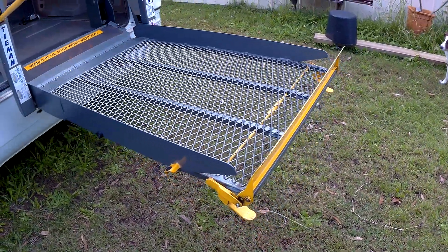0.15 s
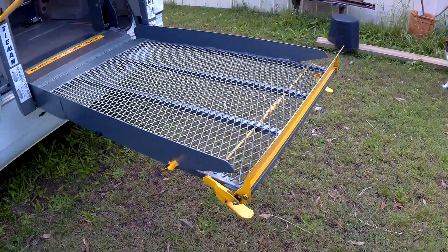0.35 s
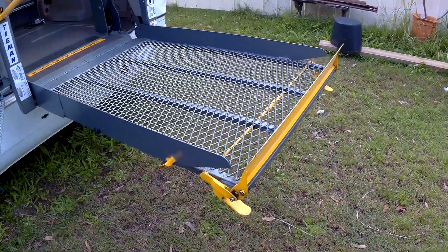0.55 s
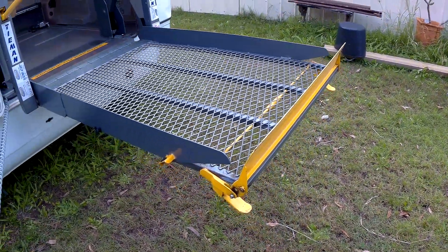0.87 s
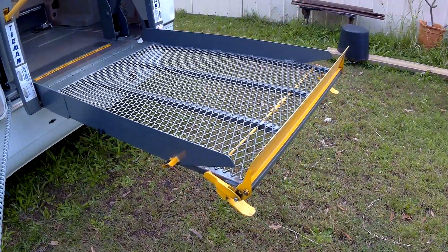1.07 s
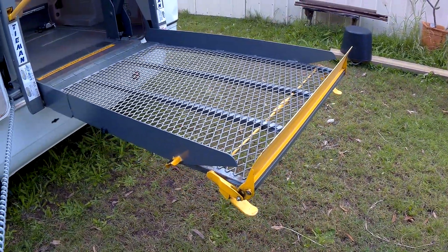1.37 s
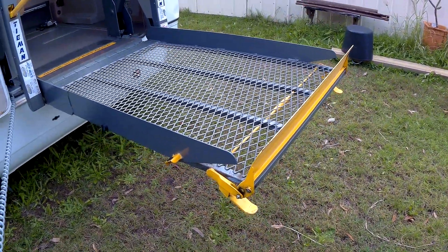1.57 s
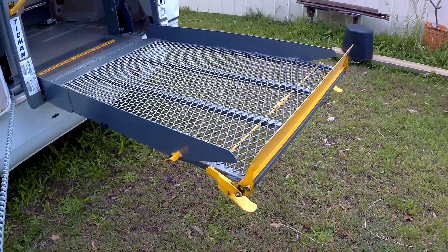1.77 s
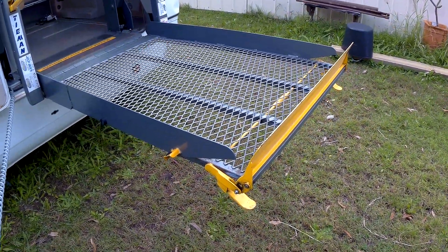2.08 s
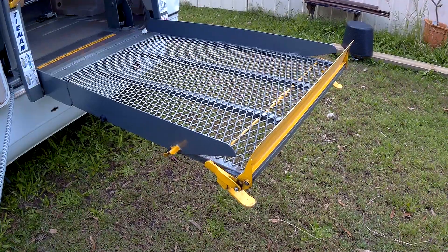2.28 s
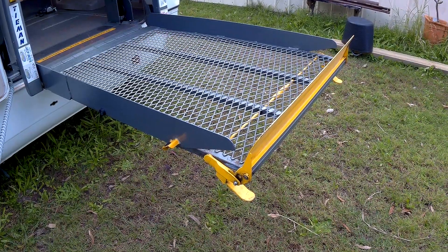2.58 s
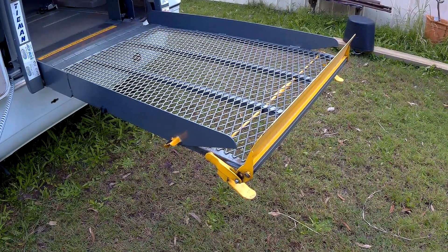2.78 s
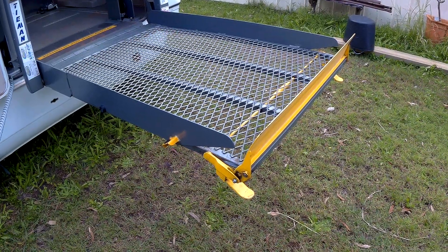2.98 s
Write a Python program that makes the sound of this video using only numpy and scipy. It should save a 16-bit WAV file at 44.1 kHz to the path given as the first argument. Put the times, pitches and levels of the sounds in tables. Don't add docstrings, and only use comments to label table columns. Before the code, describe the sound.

A wheelchair lift's electric motor whines briefly, then its steel platform seats with a rattling clunk; a close diesel van idles throughout outdoors, and light wind finally buffets the microphone.

```python
import sys
import numpy as np
from scipy import signal
from scipy.fft import rfft, irfft
from scipy.io import wavfile

SR = 44100
rng = np.random.default_rng(int(sys.argv[2]) if len(sys.argv) > 2 else 0)


def field_ratio(decibels):
    return 10 ** (np.asarray(decibels, dtype=float) / 20)


def output_pcm(signal):
    pcm = np.clip(np.atleast_2d(signal).T, -1, 1) * 32767
    wavfile.write(sys.argv[1], SR, np.round(pcm).astype(np.int16))


N = 138474


def rms_one(x):
    return x / np.sqrt(np.mean(x ** 2) + 1e-20)


def in_time(rows):
    return np.interp(np.arange(N) / SR, *np.transpose(rows))


def drift(rate_hz):
    r = np.exp(-2 * np.pi * rate_hz * 40 / SR)
    noise = rng.standard_normal(N // 40 + 2002)
    slow = signal.lfilter([1], [1, -2 * r, r * r], noise)[2000:]
    slow = rms_one(slow - slow.mean())
    return np.interp(np.arange(N) / 40, np.arange(len(slow)), slow)


def ring(x, hz, t60):
    r = field_ratio(-60 / (t60 * SR))
    w = 2 * np.pi * hz / SR
    return signal.lfilter([0, np.sin(w)], [1, -2 * r * np.cos(w), r * r], x + 1e-18)


def fade(clicks, decay_s):
    return signal.lfilter([1], [1, -np.exp(-1 / (decay_s * SR))], clicks + 1e-18)


def coloured(spectrum):
    hz, db = np.transpose(spectrum)
    f = np.arange(1, N // 2 + 2) * SR / N
    gain = field_ratio(np.interp(np.log(f), np.log(hz), db, left=-99, right=-99))
    return rms_one(irfft(rfft(rng.standard_normal(N)) * gain, N))


# multiple of the firing rate, level in dB rms.
THROB = [(1, -52), (2, -63.5), (3, -60.5), (4, -61), (5, -74.5), (6, -68.5), (7, -69.5), (9, -71)]


def throb(turns):
    out = 0
    for k, db in THROB:
        level = field_ratio(db + 1.5 * min(k - 1, 2) / 2 * drift(5.2))
        wandering = turns + 0.025 * (k > 2) * drift(1.0)
        lag = 0.1 * (k - 1) + 0.25 * (k - 1) ** 2
        out = out + np.sqrt(2) * level * np.cos(2 * np.pi * (k * wandering - lag))
    return out


# frequency in Hz, level in dB per Hz.
ROAR = [(30, -16), (110, -6), (330, -12), (760, -12.5), (1000, -20.5), (1650, -31), (2400, -31.5),
        (5000, -54)]
ROAR_DB, PATCHY_DB, PULSE_DB = -55.5, 0.5, 2.1
PULSED_ABOVE_HZ, ROAR_LAG_TURNS = 300, 0.3


def roar(turns):
    noise = rfft(coloured(ROAR))
    f = np.arange(N // 2 + 1) * SR / N
    edges = np.append(0, 80 * 2 ** np.arange(0, 6.1))
    swell_db = PULSE_DB * np.cos(2 * np.pi * (turns - ROAR_LAG_TURNS))
    out = 0
    for low, high in zip(edges, edges[1:]):
        band = irfft(noise * ((f >= low) & (f < high)), N)
        out = out + field_ratio(PATCHY_DB * drift(9.0) + (low > PULSED_ABOVE_HZ) * swell_db) * band
    return field_ratio(ROAR_DB) * out


CYLINDER_DB = [-64, -67.5, -67, -62.5]
CYLINDER_TILT = [-14, -20, 10, 22]
# time in seconds, level in dB.
LOAD = [
    (0, 0),
    (.9, -1.5),
    (1.3, -0.5),
    (1.65, 1),
    (2.1, -0.5),
    (2.4, -5),
    (3.14, -6),
]
# frequency in Hz, level in dB, decay by 60 dB in seconds.
BLOCK = [(1990, -7.5, .05), (2148, -6, 0.056), (2332, -1.5, 0.054), (2495, 0.5, 0.032),
         (2700, -12.5, 0.072), (3880, -19, 0.024), (4160, -22, 0.032)]
KNOCK_AT_TURNS, KNOCK_DECAY_S, KNOCK_RISE_T60_S = 0.83, 0.014, 0.012
KNOCK_SPREAD_DB, KNOCK_SNAP = 1, 26


def knock(turns):
    at = np.flatnonzero(np.diff(np.floor(turns - KNOCK_AT_TURNS)))
    cylinder = np.floor(turns[at]).astype(int) % 4
    level_db = np.array(CYLINDER_DB)[cylinder] + in_time(LOAD)[at] + rng.normal(0, 0.66, len(at))
    out = 0
    for hz, db, t60 in BLOCK:
        lean_db = np.array(CYLINDER_TILT)[cylinder] * np.clip(np.log2(hz / 2330), -0.2, 0.2)
        spread_db = KNOCK_SPREAD_DB * rng.standard_normal(len(at))
        clicks = np.zeros(N)
        clicks[at] = field_ratio(level_db + db + lean_db - 28.5 + spread_db)
        burst = fade(clicks, KNOCK_DECAY_S) * rng.standard_normal(N)
        struck = ring(KNOCK_SNAP * clicks + burst, hz, t60)
        out = out + ring(struck, hz, KNOCK_RISE_T60_S) * 2 * np.log(1000) / (KNOCK_RISE_T60_S * SR)
    return out


# time in seconds, turns per second.
SHAFT = [(0, 106.55), (.1, 106.5), (.45, 107.0), (.72, 107.2)]
# multiple of the shaft rate (sounded at the nearest whole one), level in dB rms,
# change over the run in dB, passing swell in dB, time of the swell in seconds.
WHINE = [(3.02, -63.5, 1.5, -0.5, .3), (9, -74, 2, -1, .3), (10.9, -68, -4.5, 1.5, .3),
         (22, -87, 6, -6, .3), (23, -74.5, -3, 8, 0.67), (26, -83.5, -2, -3, .3), (29, -97, -12, 6, .3),
         (31, -88.5, -3, 0, .3), (33, -81, -2, -0.5, .3), (34, -88, -1, 4, .3), (35, -86, -3, -1, .3),
         (44, -100, 0, 10, 0.38), (46, -90.5, -3, 10, .33), (55, -87, 4, -11, 0.39),
         (65.8, -83, 3, -10, 0.12), (68.5, -88, 4, -4, .11), (75.4, -93, 0, 0, .3),
         (87.5, -101, 7, -1, 0.56), (99, -90.5, 0, -7, 0.23), (100, -97.5, 0, 0, .3),
         (121, -97, 0, 12, .085), (135, -101, -8, 3, .3)]
# frequency in Hz, level in dB per Hz.
BRUSH = [(710, -38), (1200, -6.5), (1620, -24), (2390, -14), (2960, -28.5), (7300, -35.5), (15200, -36.5)]
BRUSH_DB, WHINE_WAVER_DB = -70, 0.6
SWELL_S, STOP_S, STOP_FADE_S = 0.062, 0.722, 0.011


def motor():
    t = np.arange(SR) / SR
    turns = np.cumsum(in_time(SHAFT))[:SR] / SR
    running = np.exp(-np.maximum(t - STOP_S, 0) / STOP_FADE_S)
    whine = 0
    for k, db, change_db, swell_db, swell_at in WHINE:
        trend_db = change_db * (t / STOP_S - 0.5)
        passing_db = swell_db * np.exp(-0.5 * np.abs((t - swell_at) / SWELL_S) ** 3)
        waver_db = WHINE_WAVER_DB * np.log10(k) * drift(21.0)[:SR]
        level = np.sqrt(2) * field_ratio(db + trend_db + passing_db + waver_db) * running ** np.sqrt(k / 66)
        whine = whine + level * np.sin(2 * np.pi * (int(round(k)) * turns + rng.random()))
    hiss = running * field_ratio(BRUSH_DB) * coloured(BRUSH)[:SR]
    return np.pad(whine + hiss, (0, N - SR))


def crack(at, db):
    clicks = np.zeros(N)
    clicks[at] = field_ratio(db)
    return field_ratio(-9) * fade(clicks, 0.007) + field_ratio(-23) * fade(clicks, 0.064)


# start in seconds, level in dB.
CONTACTS = [(0.7214, -53), (.727, -51), (0.7315, -48), (.736, -47), (.745, -53), (.754, -53.5), (.770, -54),
            (.785, -54), (.800, -59), (.828, -57), (.833, -51), (.845, -58), (.8765, -54.5)]
# frequency in Hz, level in dB, decay by 60 dB in seconds.
PLATFORM = [(481, -15, .08), (657, -15, .06), (781, -15, .08), (1070, -10, .06), (1190, -11, .06),
            (1316, -9, .06), (1443, -10, .085), (1860, -11, .06), (2250, -13, .05), (3450, -27, .04),
            (6950, -28, .03), (7800, -29, .12), (8050, -24, .08), (8270, -22, .07)]
# frequency in Hz, level in dB per Hz.
CRACK = [(180, -30), (400, -7), (1400, 0), (2200, -4), (3000, -11), (4500, -21), (9000, -32), (15200, -38)]
# frequency in Hz, level in dB per Hz.
MESH = [(6600, -9), (7000, -3.5), (7400, -15), (7900, -5), (8300, 1), (8700, -12), (9600, -7)]
STRIKE_SNAP, STRIKE_SPREAD_DB, SCRAPE_S = 12, 1.5, 0.0058
MESH_DB, MESH_DECAY_S = -31, 0.028
BOOM_S, BOOM_HZ, BOOM_DB, BOOM_T60_S, BOOM_PUSH_S = 0.724, 253, -22.5, 0.28, 0.006
MODES_DULL, MESH_DULL, CRACK_DULL, CRACK_TOP_DULL = 50, 120, 28, 50
CRACK_TOP_HZ = 2800


def clunk():
    s, db = np.transpose(CONTACTS)
    at = (s * SR).astype(int)
    late = s - s[0]

    plates = 0
    for hz, mode_db, t60 in PLATFORM:
        dull_db = MODES_DULL * late * np.log2(hz / 1000)
        spread_db = STRIKE_SPREAD_DB * rng.standard_normal(len(s))
        strikes = np.zeros(N)
        strikes[at] = field_ratio(db + mode_db - dull_db - 20.5 + spread_db)
        snap = STRIKE_SNAP * strikes * rng.choice([-1, 1], N)
        scrape = fade(strikes, SCRAPE_S) * rng.standard_normal(N)
        plates = plates + ring(snap + scrape, hz, t60)

    noise = coloured(CRACK)
    low = signal.sosfiltfilt(signal.butter(2, CRACK_TOP_HZ, fs=SR, output="sos"), noise)
    crack_db = db - CRACK_DULL * late
    cracks = crack(at, crack_db) * low + crack(at, crack_db - CRACK_TOP_DULL * late) * (noise - low)

    shakes = np.zeros(N)
    shakes[at] = field_ratio(db + MESH_DB - MESH_DULL * late)
    mesh = fade(shakes, MESH_DECAY_S) * coloured(MESH)

    push = np.zeros(N)
    push[int(BOOM_S * SR)] = field_ratio(BOOM_DB) / (BOOM_PUSH_S * SR)
    boom = ring(fade(push, BOOM_PUSH_S), BOOM_HZ, BOOM_T60_S)
    return plates + cracks + mesh + boom


# time in seconds, level in dB.
GUST = [
    (0, -63),
    (2.7, -63),
    (2.8, -63),
    (2.88, -60),
    (2.97, -58),
    (3.03, -55),
    (3.14, -53),
]
# frequency in Hz, level in dB per Hz.
WIND = [(4, -14), (30, -16), (80, -3), (155, 1), (280, -9), (600, -15), (1500, -40)]
# centre in seconds, pitch in Hz,
# level in dB rms, half length in seconds.
EDDIES = [
    (0.248, 122, -57, .03),
    (1.88, 509, -61, 0.028),
    (2.26, 190.7, -56, 0.046),
    (2.883, 85, -52.5, 0.029),
    (2.99, 204, -57, .03),
    (3.045, 153.3, -49, 0.0253),
    (3.085, 89, -57, 0.014),
    (3.09, 214, -55, 0.027),
    (3.11, 527, -62, 0.035),
    (3.122, 101, -46.5, 0.012),
]


def wind():
    t = np.arange(N) / SR
    eddies = 0
    for s, hz, db, half_s in EDDIES:
        swell = np.sqrt(2) * field_ratio(db) * np.exp(-0.5 * ((t - s) / half_s) ** 2)
        eddies = eddies + swell * np.sin(2 * np.pi * (hz * (t - s) + 0.12 * drift(10.3)))
    return field_ratio(in_time(GUST) + 2 * drift(8.0)) * coloured(WIND) + eddies


# time in seconds, firings so far.
CRANK = [(0.0, 0.14), (0.2, 4.49), (0.6, 13.18), (1.0, 21.93), (1.4, 30.78), (1.75, 38.45), (2.2, 48.23),
         (2.6, 56.9), (2.95, 64.49), (3.15, 68.83)]


def scene():
    turns = in_time(CRANK)
    engine = throb(turns) + roar(turns) + knock(turns)
    lift = motor() + clunk()
    return (engine + lift + wind())[None]


def band_limit(x):
    return signal.sosfilt(signal.butter(12, 15330, fs=SR, output="sos"), x)


# frequency in Hz, level in dB per Hz.
HISS = [(3500, 3), (4500, -1.5), (5300, -1), (9270, -2.5), (13200, -3), (15450, -10)]
HISS_DB = -83


def record(dry):
    mix = dry + field_ratio(HISS_DB) * coloured(HISS)
    return band_limit(mix)


dry = scene()
out = record(dry)
output_pcm(out)
```